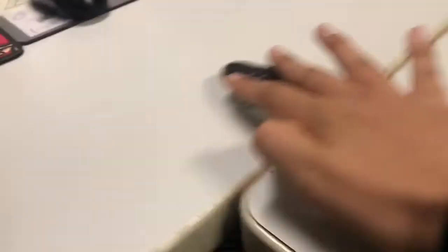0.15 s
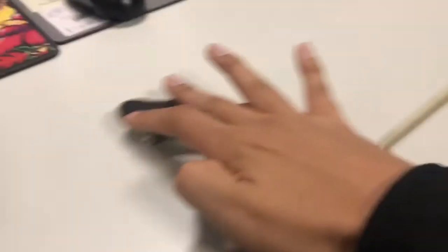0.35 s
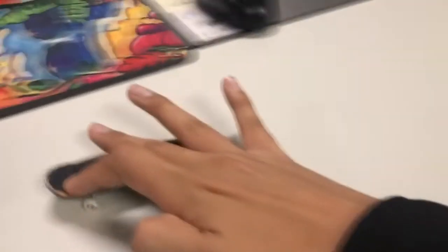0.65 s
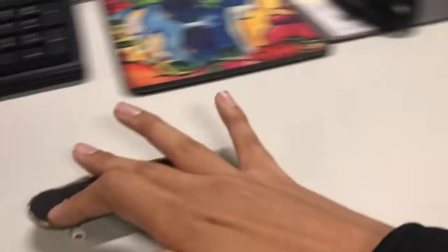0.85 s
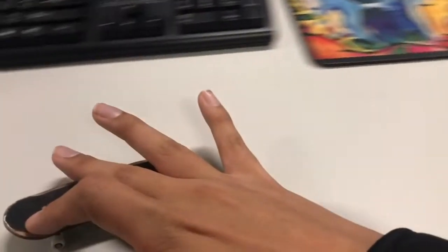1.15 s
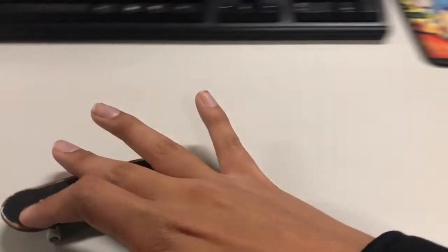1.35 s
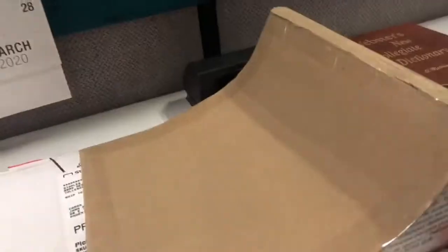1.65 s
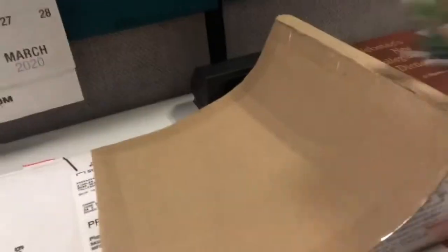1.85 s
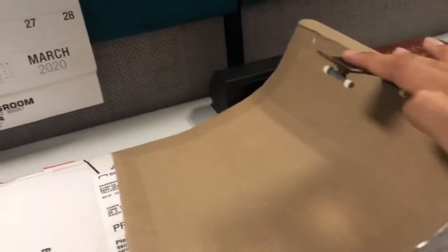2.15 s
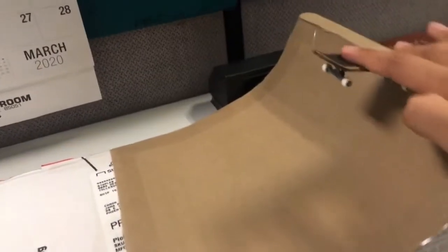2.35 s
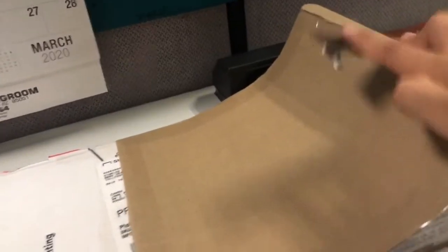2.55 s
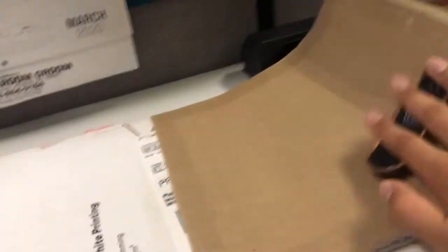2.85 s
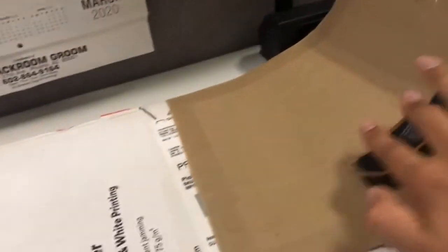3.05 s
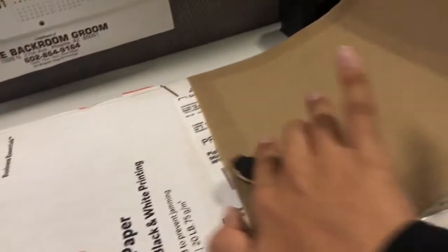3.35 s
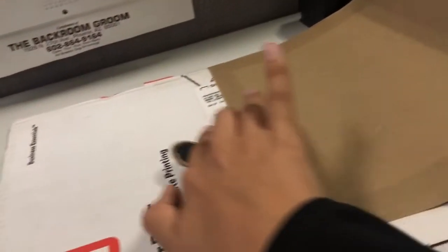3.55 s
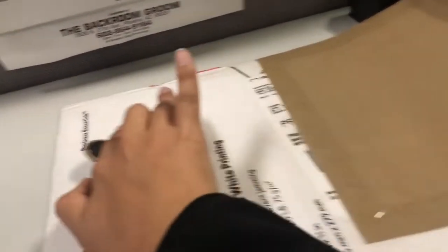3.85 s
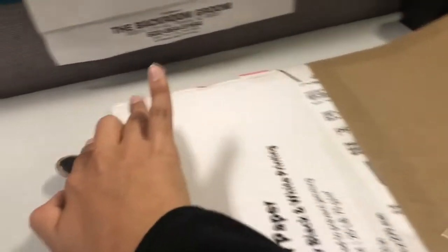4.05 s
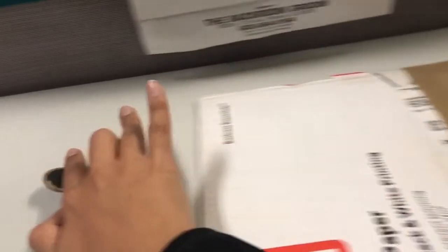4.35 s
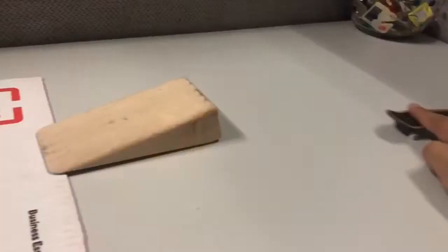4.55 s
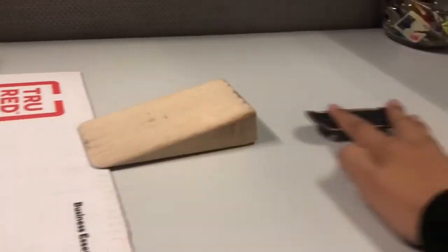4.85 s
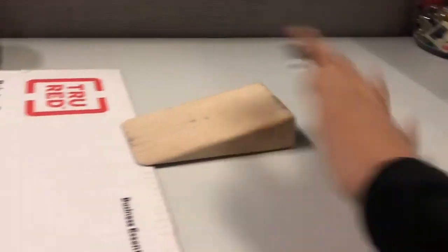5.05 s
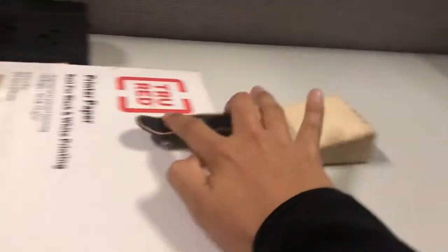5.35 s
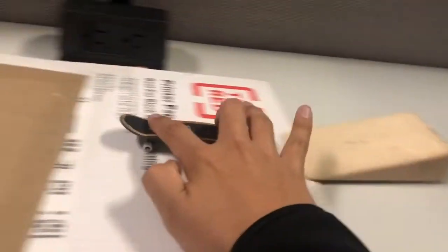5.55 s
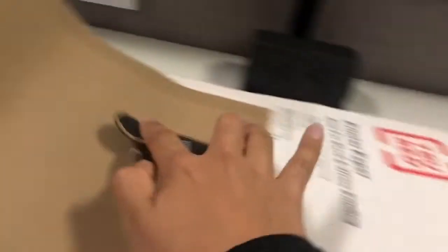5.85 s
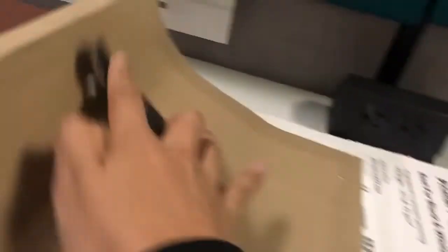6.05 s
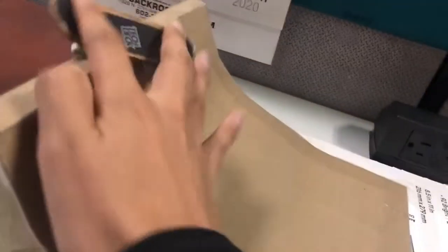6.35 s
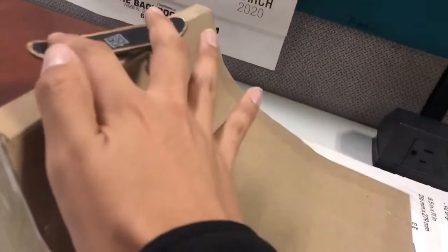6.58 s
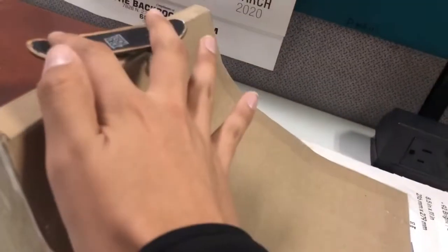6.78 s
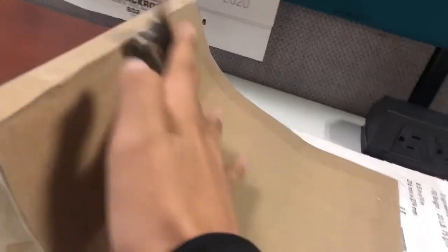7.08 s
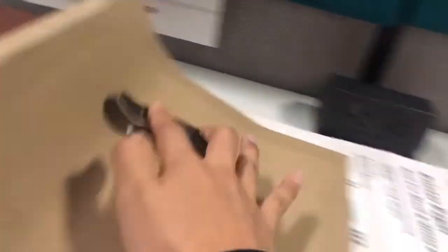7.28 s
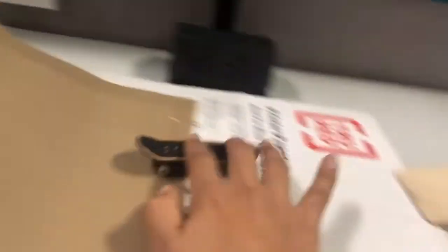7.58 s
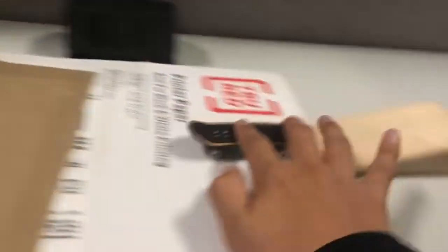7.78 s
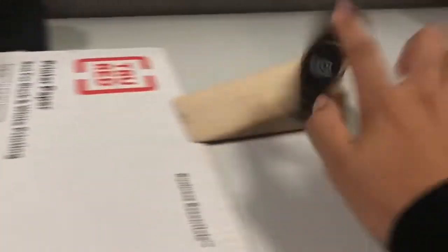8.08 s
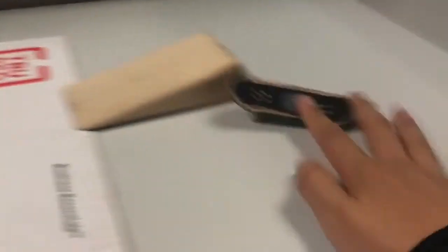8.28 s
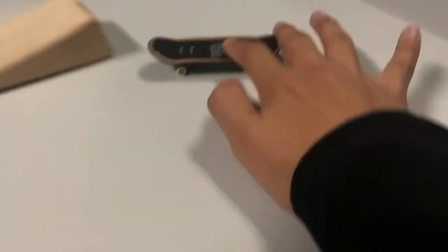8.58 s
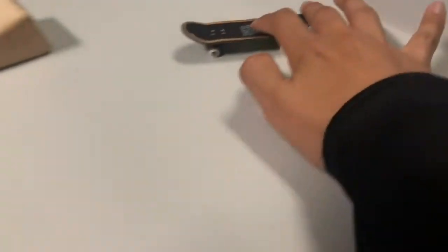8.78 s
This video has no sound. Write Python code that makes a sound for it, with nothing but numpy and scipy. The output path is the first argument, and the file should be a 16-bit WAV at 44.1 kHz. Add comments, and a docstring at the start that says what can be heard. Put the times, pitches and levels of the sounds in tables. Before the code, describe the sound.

A tiny finger-driven skateboard rolls with a bright gritty hiss along a desk, then knocks and clacks over cardboard, paper lid and wood in a quiet room.

```python
"""A fingerboard rattles along an open office desk, scuffs and knocks on to a cardboard quarter pipe, rolls down
over a paper box lid, runs up to a wooden kicker, and rides back over lid and ramp and up the kicker again.
It lands on the desk and rolls away. Small hard wheels strike the grain of each surface and ring it; pops,
landings and seams knock the panel underneath and clack the deck and metal trucks.
Throughout, ventilation rumbles in a small, dry room."""
import sys
import numpy as np
from scipy import signal
from scipy.fft import rfft, irfft, next_fast_len
from scipy.io import wavfile
from scipy.ndimage import map_coordinates

SR = 44100
rng = np.random.default_rng(int(sys.argv[2]) if len(sys.argv) > 2 else 0)


def pcm_store(signal):
    """Save signal as 16-bit PCM."""
    levels = np.round(np.clip(np.atleast_2d(signal), -1, 1) * 32767)
    wavfile.write(sys.argv[1], SR, levels.astype(np.int16).T)


N = 393372

GRIT_POWER = 0.87  # the grit grows more slowly with push than the rumble


def roll(push, modes, grit, rumble_db, grit_db, bump_rate, grain_db, wobble_db, roam_db):
    """Wheels strike countless tiny bumps of uneven size; wobbling wheels press harder and softer."""
    hits = rng.random(N) < bump_rate / SR  # bump_rate is per second
    size = undb(grain_db * np.minimum(rng.exponential(size=N), 5))
    bumps = hits * rng.standard_normal(N) * size
    press = undb(wobble_db * (walk(110) + .5 * walk(28)))
    ringing = slide(ring(bumps, modes, roam_db))
    rumble = unit(press * band(ringing, 220, 3200))
    hiss = unit(press * colour(bumps, grit))
    return undb(rumble_db) * push * rumble + undb(grit_db) * push ** GRIT_POWER * hiss


# resonances of the open stretch of desk: pitch_hz, width_hz, relative_level_db
OPEN_DESK_MODES = [(450, 160, -19.5), (900, 66, -7.5), (1033, 52, -4.5), (1217, 123, -1), (1380, 130, -4),
                   (1690, 330, -7)]
# its fine grit: pitch_hz, relative_density_db (per Hz)
OPEN_DESK_GRIT = [(1500, -18), (2250, -9.5), (2550, -1.5), (2900, -0.5), (3250, 2.5), (3650, 2),
                  (4300, -10.5), (5200, -8), (5700, -11), (6200, -11), (7200, -13), (8600, -10.5),
                  (9600, -11.5), (11000, -14.5), (15500, -21)]


def roll_open_desk(push):
    """Dense bumps ring the open desk top under a bright grit."""
    return roll(push, OPEN_DESK_MODES, OPEN_DESK_GRIT, rumble_db=-41.5, grit_db=-48.5,
                bump_rate=14000, grain_db=2.5, wobble_db=1.0, roam_db=0.4)


# resonances of the cardboard ramp: pitch_hz, width_hz, relative_level_db
CARDBOARD_MODES = [(285.5, 49, -2), (445, 140, 2), (558, 160, 1), (674, 130, 0), (900, 270, -5),
                   (1420, 230, -7.5), (1770, 390, -11)]
# its fine grit: pitch_hz, relative_density_db (per Hz)
CARDBOARD_GRIT = [(1500, -4), (2250, -1), (3300, -2.5), (4500, -7.5), (6500, -13.5), (10000, -17),
                  (15500, -19.5)]


def roll_cardboard(push):
    """Sparser bumps ring the cardboard ramp."""
    return roll(push, CARDBOARD_MODES, CARDBOARD_GRIT, rumble_db=-41.0, grit_db=-50.0,
                bump_rate=2400, grain_db=0.5, wobble_db=0.5, roam_db=1.5)


# resonances of the paper box lid: pitch_hz, width_hz, relative_level_db
PAPER_MODES = [(247, 56, 0), (482, 250, -6.5), (700, 180, -3), (1150, 420, -12), (1450, 160, -9),
               (1900, 510, -19)]
# fine grit of the lid, shared by the kicker and the free spin: pitch_hz, relative_density_db (per Hz)
PAPER_GRIT = [(1500, -11.5), (2250, -9.5), (2750, -5), (3300, -1), (4100, -6), (5500, -10), (7500, -12.5),
              (15500, -19)]


def roll_paper(push):
    """The lid rings low, and its modes swell and fade widely."""
    return roll(push, PAPER_MODES, PAPER_GRIT, rumble_db=-43.5, grit_db=-47.5,
                bump_rate=5600, grain_db=1.0, wobble_db=2.0, roam_db=3.0)


# resonances of the rest of the desk: pitch_hz, width_hz, relative_level_db
DESK_MODES = [(511, 370, -12), (770, 124, -4.5), (980, 235, -6), (1150, 120, -4), (1370, 120, -8.5),
              (1785, 320, -14)]
# its fine grit: pitch_hz, relative_density_db (per Hz)
DESK_GRIT = [(1500, -17), (2250, -3.5), (2850, -7), (3450, -1), (4300, -8.5), (5200, -11.5), (7000, -18),
             (9500, -16.5), (15500, -25.5)]


def roll_desk(push):
    """Bumps ring the rest of the desk top."""
    return roll(push, DESK_MODES, DESK_GRIT, rumble_db=-43.0, grit_db=-51.0,
                bump_rate=7400, grain_db=-1.0, wobble_db=1.5, roam_db=1.25)


# resonances of the wooden kicker: pitch_hz, width_hz, relative_level_db
WOOD_MODES = [(644, 94, -3), (840, 240, -4.5), (1046, 830, -14), (1540, 216, -13)]


def roll_wood(push):
    """The kicker's few modes swell and fade strongly under wobbling wheels."""
    return roll(push, WOOD_MODES, PAPER_GRIT, rumble_db=-40.0, grit_db=-48.0,
                bump_rate=10000, grain_db=-3.5, wobble_db=3.5, roam_db=-6.5)


# pitch of the ringing panel as the board travels over it: time_s, pitch_ratio
PANEL_PITCH = [(1.451, 0.99), (2.9, 1.05), (3.151, 0.88), (3.6, 1.04), (4.15, 1.07), (4.8, 1.066),
               (5.2, 1.05), (5.66, 0.88), (5.86, 0.96), (5.998, .95), (7.1, 1.086), (7.26, 0.97),
               (7.409, 0.78), (7.5, 1.05), (8.52, 0.99), (8.849, 0.98)]


def slide(x):
    """Shift the pitch of a ringing panel with the place of the wheels on it."""
    ratio = np.interp(np.arange(N) / SR, *np.transpose(PANEL_PITCH))
    return map_coordinates(x, [np.cumsum(ratio)], order=1, mode="mirror")


# how hard the wheels roll, one curve a ride: time_s, push_db (over an ordinary push)
# rides: open desk; down ramp and over lid; run-up; down kicker and up ramp; drop in and up kicker; roll away
RIDES = [
    [(0, 5), (.27, 0.5), (.41, 2.5), (.5, 4), (.72, 5.5), (1.15, 1), (1.47, -1.5)],
    [(2.86, -7), (2.97, 2), (3.2, -8), (3.66, -3), (3.84, -9), (3.93, 0), (4.03, -2), (4.09, -1),
     (4.16, -3), (4.33, -15.5)],
    [(4.36, -7), (4.45, 6.5), (4.49, -4.5), (4.58, 2), (4.72, 3.5), (4.84, -5.5)],
    [(5.05, -3), (5.21, -4), (5.32, -8), (5.52, 0), (5.63, -2.5), (5.71, 5), (5.81, 2.5), (5.87, 7.5),
     (5.97, 3.5), (6.16, -20.5)],
    [(6.99, 4), (7.09, -1.5), (7.15, 5.5), (7.42, 1), (7.5, 7), (7.6, 3), (7.71, 8.5), (7.82, -1),
     (7.89, 4)],
    [(8.25, -6.5), (8.32, -12), (8.44, -2.5), (8.55, -0.5), (8.75, -1.5), (8.92, -2.5)],
]
# short scuffs of the wheels on desk, ramp and lip: start_s, length_s, push_db (over an ordinary push)
SCUFFS = [(1.572, 0.19, -17), (1.737, 0.14, -8.5), (2.363, 0.16, -12), (2.68, 0.079, -2.5),
          (6.156, 0.2, -11), (6.798, 0.17, -2.5)]
TOUCH_S, LIFT_S = 0.033, 0.0046  # the wheels set down and lift off


def effort():
    """How hard the wheels roll: 1 at an ordinary push, 0 in the air or at rest."""
    t = np.arange(N) / SR
    out = sum(undb(db) * hump(start, length) for start, length, db in SCUFFS)
    for ride in RIDES:
        s, db = np.transpose(ride)
        landed = np.clip(1 + (t - s[0]) / TOUCH_S, 0, 1)
        not_lifted = np.clip(1 - (t - s[-1]) / LIFT_S, 0, 1)
        out = out + landed * not_lifted * undb(np.interp(t, s, db))
    return out


# what lies under the wheels: from_s, surface
ROUTE = [(0, "open desk"), (1.7, "cardboard"), (3.301, "paper"), (3.91, "desk"), (4.999, "wood"),
         (5.25, "paper"), (5.632, "cardboard"), (7.428, "paper"), (7.67, "wood"), (8.051, "desk")]
CROSS_S = 0.044  # front and rear wheels cross a seam this far apart


def on(surface):
    """Share of the wheels, 0-1, that stand on this surface."""
    t = np.arange(N) / SR
    ends = [s for s, _ in ROUTE[1:]] + [np.inf]
    return sum(np.clip(np.minimum(t - s, end - t) / CROSS_S + .5, 0, 1)
               for (s, name), end in zip(ROUTE, ends) if name == surface)


def gliding_noise(rows, width_hz):
    """A band of wheel noise swells and fades on each stretch while its centre glides."""
    times = [s for start, length, *_ in rows for s in (start, start + length)]
    centres = [centre for row in rows for centre in row[2:4]]
    hz = np.interp(np.arange(N) / SR, times, centres)
    gain = sum(undb(db) * hump(start, length) for start, length, _, _, db in rows)
    return gain * sliding_band(hz, width_hz, evenness=0.2)


# the hiss gathers on fast stretches: start_s, length_s, from_hz, to_hz, level_db (at the swell's peak)
SWISHES = [(-.06, 0.3, 5090, 5000, -47.5), (.3, 0.96, 9620, 8160, -60.5), (4.52, 0.34, 4983, 5000, -56),
           (5.08, 0.22, 5760, 5700, -64), (5.362, 0.31, 5900, 5400, -56), (5.66, .34, 4916, 4900, -55.5),
           (7.42, 0.46, 4870, 5070, -49.5)]


def swishes():
    """On fast stretches the hiss of the wheels gathers in one broad band."""
    return gliding_noise(SWISHES, width_hz=820)


# the rumble gathers in one band: start_s, length_s, from_hz, to_hz, level_db (at the swell's peak)
WHIRRS = [(.43, .37, 910, 883, -44), (.8, .17, 1370, 1450, -39.5), (2.86, .26, 400, 409, -45),
          (4.05, .27, 1120, 1161, -58), (5.035, .07, 1340, 1150, -41), (5.14, .098, 890, 830, -39.5),
          (5.42, .33, 720, 621, -47), (5.83, .09, 640, 700, -32), (7.12, .23, 538, 429, -42),
          (8.37, .32, 1270, 1180, -43)]


def whirrs():
    """Where the panel answers most, the rumble gathers in one narrower band."""
    return gliding_noise(WHIRRS, width_hz=180)


# the wheels sing on the hard desk top: start_s, length_s, pitch_hz, level_db (at the peak, before throb)
SINGS = [(0.031, 0.42, 1222, -41), (0.423, 0.31, 1213, -37.5), (0.62, 0.1, 1200, -42.5),
         (0.956, .46, 1238, -45.5), (4.109, 0.079, 1158, -49), (4.61, 0.12, 1185, -44)]
SING_DRIFT = 0.0052  # spread of the pitch wander, as a ratio
WHEEL_TURNS_PER_S, SING_THROB = 32, 0.37  # mean turns; depth of the throb, once a turn


def sing():
    """A thin, wavering tone of the wheels on the desk that comes and goes."""
    middles = [start + length / 2 for start, length, _, _ in SINGS]
    hz = np.interp(np.arange(N) / SR, middles, [row[2] for row in SINGS])
    gain = sum(undb(db) * hump(start, length) for start, length, _, db in SINGS)
    turns = np.cumsum(WHEEL_TURNS_PER_S * (1 + .15 * walk(8))) / SR
    throb = 1 + SING_THROB * np.sin(2 * np.pi * turns)
    return gain * throb * sliding_band(hz * (1 + SING_DRIFT * walk(6.6)), width_hz=14.0, evenness=0.94)


def dust(push, rate, level_db):
    """Specks on the hard desk crackle under the wheels, above the even hiss."""
    specks = (rng.random(N) < rate / SR) * rng.uniform(0.29, 1, N)  # rate is per second
    t = np.arange(SR // 100) / SR
    crunch = signal.fftconvolve(specks, np.exp(-t / 0.0024))[:N] * rng.standard_normal(N)
    return undb(level_db) * push ** GRIT_POWER * unit(band(crunch, 6400, 14000))


BEARING_HZ, BEARING_DB = 3500, -64.5  # level at an ordinary push


def bearings(push):
    """The bearings ring in one steady band on every surface, even under a light push."""
    return undb(BEARING_DB) * np.sqrt(push) * sliding_band(np.full(N, BEARING_HZ), width_hz=450, evenness=0)


SPIN_DB, SPIN_DOWN_S = -61.5, 0.12  # level at a steady ordinary push; time constant of the lag


def free_spin(push):
    """The bearings follow the ride with a lag and run down when the board is in the air."""
    keep = np.exp(-1 / (SPIN_DOWN_S * SR))
    spin = signal.lfilter([1 - keep], [1, -keep], push)
    whirr = colour(rng.standard_normal(N), PAPER_GRIT) * undb(1.5 * walk(70))
    return undb(SPIN_DB) * spin * unit(whirr)


# what a blow rings in the table: pitch_hz, width_hz, relative_level_db
TABLE_MODES = [(126.7, 19, -11.5), (170, 61, -1), (303, 90, -2.5)]
# in the panel under the board: pitch_hz, width_hz, relative_level_db
PANEL_MODES = [(431, 150, 6.5), (510, 244, 4.5), (718, 130, 3), (915, 570, -7.5), (1260, 270, -5),
               (1450, 210, -1.5), (1780, 200, -1.5)]
# in the deck: pitch_hz, width_hz, relative_level_db
DECK_MODES = [(2300, 310, 0), (2840, 200, 0.5), (3310, 590, 1.5), (4500, 1500, -1), (5500, 1500, -1.5)]
# in the metal trucks: pitch_hz, width_hz, relative_level_db
TRUCK_MODES = [(6130, 600, -1), (7310, 350, -4), (8630, 1300, -1), (10430, 3700, 1.5), (12260, 4100, 1.5),
               (15800, 6700, -9)]


def blow(levels_db, knock_hz, clack_hz, trail_s, panel_t60):
    """Trucks tick and the deck clacks at once; the panel's knock and the table's thump sweep in behind."""
    t = np.arange(SR // 4) / SR
    push = 1.0 * (t == 0)
    # thump and knock: a first clean bending wave, then the modes of the plate that it has crossed
    table = ring(contact(t, t60=0.025, chatter=1.0, tail_db=-10.5, tail_t60=0.4), TABLE_MODES)
    thump = unit(band(push, 140, 350)) + undb(-0.5) * unit(band(table, 120, 730))
    panel = ring(contact(t, t60=0.016, chatter=1.0, tail_db=4.0, tail_t60=panel_t60), struck(PANEL_MODES))
    first_knock = unit(band(push, knock_hz * 0.72, knock_hz * 1.345))
    panel_ring = unit(band(panel, knock_hz * 0.61, knock_hz * 1.16, order=1))
    knock = first_knock + undb(1.0) * panel_ring
    deck = ring(contact(t, t60=0.014, chatter=2.1, tail_db=-11, tail_t60=0.076), struck(DECK_MODES))
    clack = band(deck, clack_hz * 0.76, clack_hz * 1.45, order=1)
    trucks = ring(contact(t, t60=0.011, chatter=16.0, tail_db=5.0, tail_t60=0.058), TRUCK_MODES)
    tick = band(trucks, 6400, 24000)
    seating = 1 - np.exp(-t / 0.00045)  # the contact firms up over a fraction of a millisecond
    thump = bend(thump, lag_s=trail_s, first_khz=0.9)
    knock = bend(knock, lag_s=0.002263, first_khz=2.28)
    parts = (thump, knock, clack * seating, tick * seating)
    window = .01 * SR  # each level is the energy of that part spread over 10 ms
    return sum(undb(db) * np.sqrt(window) * p / np.linalg.norm(p) for db, p in zip(levels_db, parts))


# pops, landings and seams: time_s, knock_db (panel), then over the knock:
# thump_db (table), clack_db (deck), tick_db (trucks); then knock_hz, clack_hz
BLOWS = [(.03, -34, -16, -1, -6, 520, 4000), (1.6243, -26, 1.5, -7, -10.5, 620, 4530),
         (1.628, -33, -10, -17, -5, 1330, 4140), (1.7555, -30.5, -17, -29, -14, 1550, 2110),
         (1.7565, -15.5, -14.5, -26.5, -38.5, 690, 4900), (1.759, -34.5, -4, -9, -4, 480, 5250),
         (1.786, -41, -5, -23, -17, 756, 2400), (2.5594, -30, 0, -9.5, -17, 760, 4800),
         (2.562, -30.5, -11, -22, -4, 666, 4800), (2.609, -29.5, -14, -6, -16, 900, 2500),
         (2.612, -24, -15, -5.5, -8.5, 744, 3000), (2.6272, -24.5, -6, -8, -15, 900, 2500),
         (2.6505, -38, -5, -1, -4, 840, 3300), (2.6542, -13, -6, -5, -17.5, 900, 2310),
         (2.665, -24, 0, -24, -24, 700, 2400), (2.717, -41.5, -16, -8.5, -12.5, 800, 2400),
         (3.262, -42, -12, -0.5, -7, 1090, 3200), (3.319, -52, 10.5, 4.5, -1, 820, 3300),
         (3.411, -48, -2, 9.5, 3, 887, 3300), (3.444, -47.5, 5, 2, 0, 617, 3300),
         (3.899, -27, -11.5, -2, -.5, 820, 3320), (3.99, -49.5, -8, 5.5, -6, 900, 3420),
         (4.034, -31.5, -2, 4.5, -1.5, 796, 2611), (4.8416, -31, -2, 0.5, -3.5, 1500, 4300),
         (4.845, -31.5, -16, -11, -9, 480, 3580), (5.0123, -19.5, -6, -3.5, 1.5, 1450, 4280),
         (5.015, -23.5, -4, -8, -19, 586, 3580), (5.0222, -30, 2, -7, 3, 1044, 4000),
         (5.03, -24.5, -3.5, -2, 5.5, 1570, 4560), (5.0439, -26, -7, -4.5, 1, 1000, 4500),
         (5.1001, -38, -3, -5, -5, 800, 4300), (5.111, -40, 5, -2, 0.5, 1250, 4320),
         (5.242, -34, 0, -1, -3.5, 840, 4330), (5.641, -51.5, -9, 4, 1, 700, 4380),
         (5.686, -45, 8, 0, -18, 600, 3000), (5.749, -42, -3, -19, -25, 1080, 2600),
         (5.857, -42, -7, -5, -16, 1081, 3200), (5.944, -33.5, -20, -14, -21, 1150, 3000),
         (6.0, -38, -15, -27, -30, 700, 2480), (6.019, -42, -10, -16, -26, 1110, 2395),
         (6.116, -48.5, -10, -5.5, -7, 665, 3577), (6.188, -51, -11, -8, -16, 900, 2588),
         (6.193, -36, -26, -16, -18, 900, 2595), (6.268, -49, 1, -13.5, -4, 808, 3380),
         (6.28, -33.5, -6, -8.5, -11, 689, 3415), (6.847, -39.5, -18, -6.5, -17.5, 900, 2506),
         (6.859, -43.5, -11, -0.5, -4, 1110, 4400), (6.867, -30, -19, -22, -20, 1000, 2976),
         (6.891, -25, -22, -24, -22, 646, 4420), (6.901, -36, -12, -13, -11.5, 605, 5020),
         (6.984, -29, -19, -19, -29, 674, 3200), (7.015, -37.5, -14, -16, -24, 1305, 3590),
         (7.047, -28, -13, -9.5, -20, 1261, 4500), (7.056, -33, -7.5, -20, -22, 562, 4400),
         (7.382, -40, -9, -2, -7.5, 752, 4050), (7.394, -41, 12, 5, -13, 548, 3020),
         (7.49, -40, 2, -1.5, -11, 900, 3994), (7.6783, -37, -13, 10.5, 5, 1124, 3801),
         (7.6805, -24, -7.5, 0.5, 1.5, 1250, 3560), (7.692, -38, 7, -6, -12, 600.8, 3600),
         (7.7642, -28, -4.5, -0.5, 2, 1029, 5240), (7.7865, -49.5, 9, 10, 16, 782, 4999),
         (7.8805, -22.5, -16.5, -4.5, -19, 1025, 3093), (8.0334, -25.5, -8, 1, -5.5, 1204, 3932),
         (8.083, -22.5, -11.5, -1, 6, 1050, 3700), (8.1125, -52, 2, -4, 1, 900, 4000),
         (8.1165, -43, -1, 0, 7, 900, 4000), (8.121, -39, 2, 14, 20, 840, 3280),
         (8.127, -29.5, -8, 6, 6.5, 834, 2740), (8.135, -33, -5, -3, -5, 700, 3590),
         (8.246, -44, -19, 11.5, 13.5, 1160, 3400), (8.249, -49, -20, 6.5, -3, 1170, 3080)]
# the light ramp answers at once and dies fast; on every other surface the thump trails and the panel rings on
RAMP_TRAIL_S, RAMP_T60_S = .0015, 0.026
DESK_TRAIL_S, DESK_T60_S = 0.00519, .05


def blows():
    """Every blow knocks the panel under the board, with its own share of thump, clack and tick."""
    out = np.zeros(N + SR)
    for s, db, thump_db, clack_db, tick_db, knock_hz, clack_hz in BLOWS:
        surface = [name for since, name in ROUTE if since <= s][-1]
        on_ramp = surface == "cardboard"
        trail_s, panel_t60 = (RAMP_TRAIL_S, RAMP_T60_S) if on_ramp else (DESK_TRAIL_S, DESK_T60_S)
        levels_db = (db + thump_db, db, db + clack_db, db + tick_db)
        sound = blow(levels_db, knock_hz, clack_hz, trail_s, panel_t60)
        start = int(s * SR)
        out[start:start + len(sound)] += sound
    return out[:N]


def contact(t, t60, chatter, tail_db, tail_t60):
    """One push, a burst of chatter as the parts seat, and a longer buzz."""
    burst, buzz = (rng.standard_normal(len(t)) * np.exp(-np.log(1000) * t / d) for d in (t60, tail_t60))
    return (t == 0) + chatter * burst / np.linalg.norm(burst) + undb(tail_db) * buzz / np.linalg.norm(buzz)


SPOT_SPREAD_DB = 1


def struck(modes):
    """Each blow lands on another spot and favours other modes."""
    return [(hz, width, db + SPOT_SPREAD_DB * rng.standard_normal()) for hz, width, db in modes]


def bend(x, lag_s, first_khz):
    """Bending waves travel as the root of frequency: first_khz arrives at once, the lows trail behind."""
    khz = np.fft.rfftfreq(len(x), 1 / SR) / 1000
    phase = 2 * np.pi * 1000 * lag_s * (2 * np.sqrt(khz) - khz / np.sqrt(first_khz))
    fade = np.linspace(1, 0, len(x))  # the wave dies out on its way
    return irfft(rfft(x) * np.exp(-1j * phase), len(x)) * fade


def after_ring(rows, modes):
    """Lightly damped modes ring on after a blow; each row's level sets the ring's peak."""
    tone = ring(1.0 * (np.arange(SR // 2) == 0), modes)
    out = np.zeros(N + SR)
    for s, db in rows:
        start = int(s * SR)
        out[start:start + len(tone)] += undb(db) * tone / np.abs(tone).max()
    return out[:N]


# the steel axles: pitch_hz, width_hz, relative_level_db
AXLE_MODES = [(7350, 72, -4), (8000, 70, 3), (9030, 80, 8), (10400, 100, -2.5)]
# when they ring: time_s, peak_db
AXLE_RINGS = [(5.0135, -18), (5.0305, -11), (5.0445, -25.5), (8.128, -23.5)]


def axle_rings():
    """Hard blows leave the steel axles ringing high."""
    return after_ring(AXLE_RINGS, AXLE_MODES)


# the low boom after some blows: pitch_hz, width_hz, relative_level_db
BOOM_MODES = [(123, 6.3, -0.5), (163, 12, -5)]
# when it booms: time_s, peak_db
BOOMS = [(4.848, -40), (5.046, -26.5), (6.288, -34), (8.134, -30)]


def booms():
    """Some blows leave a low boom in two narrow modes."""
    return after_ring(BOOMS, BOOM_MODES)


# a short gritty scrape grows just before some knocks: end_s, length_s, end_level_db
SCRAPES = [(1.63, 0.022, -35), (4.037, 0.017, -30.5), (4.839, 0.026, -32)]
# colour of the scrape: pitch_hz, relative_density_db (per Hz)
SCRAPE_SPECTRUM = [(500, -10.5), (1200, 2), (2200, -4.5), (3500, -5), (6000, -9), (15500, -24)]


def scrapes():
    """Rough noise grows in a straight line and stops short, just before some knocks."""
    t = np.arange(N) / SR
    gain = sum(undb(db) * np.clip(1 + (t - s) / length, 0, 1) * (t < s) for s, length, db in SCRAPES)
    return gain * unit(colour(rng.standard_normal(N), SCRAPE_SPECTRUM) * undb(2.9 * walk(600)))


# the loose trucks rattle after landings and on the lip: start_s, length_s, relative_level_db
RATTLES = [(1.66, .015, -45), (1.77, .06, -54), (2.68, .07, -66), (6.184, .07, -48.5), (6.262, .065, -46),
           (6.853, .065, -51), (7.003, .07, -43), (7.11, .07, -40), (8.135, .03, -49)]
RATTLE_PER_S, RATTLE_UNEVEN = 110, 1  # typical tick rate; spread of the log of the gaps
RATTLE_SPREAD_DB, RATTLE_DECAY_S = 1.5, 0.0013


def rattle():
    """Runs of small, uneven ticks of the trucks against the deck."""
    ticks = np.zeros(N)
    for start, length, db in RATTLES:
        gap, size = rng.standard_normal(size=(24, 2)).T
        after = np.cumsum(np.exp(RATTLE_UNEVEN * gap) / RATTLE_PER_S) - .5 / RATTLE_PER_S
        kept = (after > 0) & (after < length)
        ticks[((start + after[kept]) * SR).astype(int)] = undb(db + RATTLE_SPREAD_DB * size[kept])
    decay = np.exp(-np.arange(SR // 100) / SR / RATTLE_DECAY_S)
    bursts = signal.fftconvolve(ticks, decay / np.linalg.norm(decay))[:N] * np.sqrt(SR / RATTLE_PER_S)
    return band(ring(bursts * rng.standard_normal(N), DECK_MODES + TRUCK_MODES), 1500, 9000, order=1)


HAND_LAG_S, HAND_SWAY_S, HAND_SWAYS_PER_S = 0.000855, 0.0001, 3.8  # mean lag, its spread, its wander rate


def under_hand(x, echo_db):
    """The rider's swaying hand mirrors the board; the moving echo combs the sound and its colour drifts."""
    lag = HAND_LAG_S + HAND_SWAY_S * walk(HAND_SWAYS_PER_S)
    echo = map_coordinates(x, [np.arange(N) - lag * SR], order=3)
    return (x + undb(echo_db) * echo) / np.hypot(1, undb(echo_db))


def office(x, wet_db, t60):
    """Desk and partitions return a short, dull tail."""
    t = np.arange(SR // 2) / SR
    decay = np.exp(-np.log(1000) * t / t60) * (t > .006)
    tail = band(rng.standard_normal(len(t)) * decay, 90, 9900, order=1)
    return x + undb(wet_db) * signal.fftconvolve(x, tail / np.linalg.norm(tail))[:N]


# colour of the ventilation: pitch_hz, relative_density_db (per Hz)
AIR = [(25, -31.5), (43, -6), (79, -5.5), (113, -2), (150, -3.5), (221, -9.5), (300, -13), (380, -18),
       (480, -25.5), (850, -23.5), (1200, -30.5), (3500, -40.5), (4600, -45.5), (7500, -50), (15500, -55)]
AIR_DB = -46


def ventilation():
    """Low, steady air noise that wavers a little."""
    waver = undb(1.2 * walk(3.7))
    return undb(AIR_DB) * unit(colour(rng.standard_normal(N), AIR) * waver)


def undb(db):
    """Decibels to gain."""
    return 10 ** (np.asarray(db) / 20)


def unit(x):
    """Scale to rms 1."""
    return x / np.sqrt(np.mean(x ** 2))


def ring(x, modes, roam_db=0):
    """Parallel resonances of alternating sign; with roam_db each swells and fades as wheels cross its nodes."""
    out = 0
    for k, (hz, width, db) in enumerate(modes):
        gain = undb(db + roam_db * walk(14)) if roam_db else undb(db)
        out = out + (-1) ** k * gain * signal.lfilter(*signal.iirpeak(hz, hz / width, fs=SR), x)
    return out


def colour(x, points):
    """Shape the spectrum of x by (Hz, dB) points."""
    hz, db = np.transpose(points)
    size = next_fast_len(len(x))
    f = np.fft.rfftfreq(size, 1 / SR) + 1  # keeps the log finite at 0 Hz
    return irfft(rfft(x, size) * undb(np.interp(np.log(f), np.log(hz), db)), size)[:len(x)]


def band(x, low_hz, high_hz, order=2):
    """Causal band-pass."""
    edges = [low_hz, min(high_hz, SR / 2 - 1)]
    return signal.sosfilt(signal.butter(order, edges, "band", fs=SR, output="sos"), x)


def walk(rate):
    """Smooth random wander with a spread near 1, through rate random points a second."""
    steps = np.arange(N) / SR * rate
    return np.interp(steps, np.arange(N), rng.standard_normal(N))


def sliding_band(hz, width_hz, evenness):
    """A narrow band of noise on a moving centre; evenness 0-1 steadies its level towards a wavering tone."""
    noise = rng.standard_normal(N) + 1j * rng.standard_normal(N)
    flutter = signal.sosfilt(signal.butter(2, width_hz / 2, fs=SR, output="sos"), noise)
    flutter = flutter / np.abs(flutter) ** np.clip(evenness, 0, 1)
    return unit((flutter * np.exp(2j * np.pi * np.cumsum(hz) / SR)).real)


def hump(start, length):
    """A rounded swell and fade, peak 1."""
    u = np.clip((np.arange(N) / SR - start) / length, 0, 1)
    return 4 * u * (1 - u)


def scene():
    """The ride across the surfaces, in the room."""
    push = effort()
    open_desk, desk = push * on("open desk"), push * on("desk")
    wheels = (roll_open_desk(open_desk) + roll_desk(desk) + roll_cardboard(push * on("cardboard"))
              + roll_paper(push * on("paper")) + roll_wood(push * on("wood")))
    wheels = wheels + swishes() + whirrs() + sing() + dust(open_desk + desk, rate=44, level_db=-61.5)
    wheels = wheels + bearings(push) + free_spin(push - open_desk)  # no free spin from the open desk
    impacts = blows() + axle_rings() + booms()
    board = under_hand(wheels + impacts + scrapes() + rattle(), echo_db=-20.5)
    return (office(board, wet_db=-24.5, t60=0.19) + ventilation())[None]


# the level dips briefly: time_s, half_width_s
DIPS = [(1.479, 0.041), (4.352, 0.023), (8.925, 0.037)]
TOP_HZ = 15900


def record(dry):
    """The level dips briefly, peaks are held to full scale and the treble above TOP_HZ is cut."""
    t = np.arange(N) / SR
    gain = np.prod([np.clip(np.abs(t - s) / width, .08, 1) for s, width in DIPS], axis=0)
    limited = np.clip(dry * gain, -1, 1)
    return signal.sosfilt(signal.ellip(8, .2, 70, TOP_HZ, fs=SR, output="sos"), limited)


dry = scene()
out = record(dry)
pcm_store(out)
```